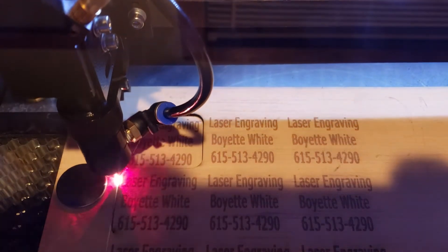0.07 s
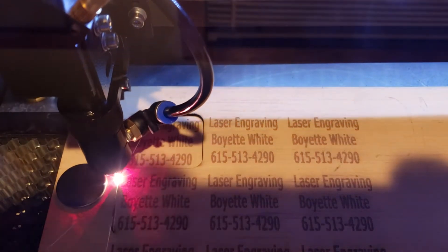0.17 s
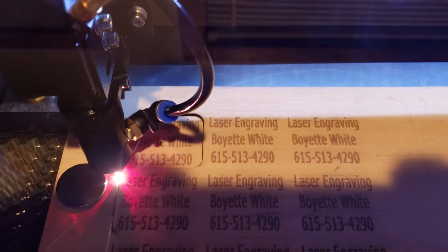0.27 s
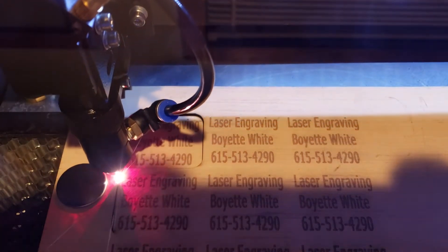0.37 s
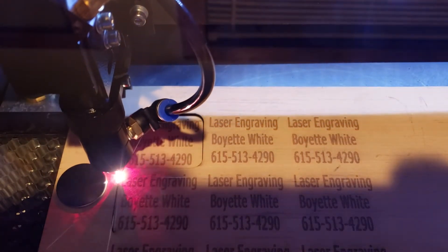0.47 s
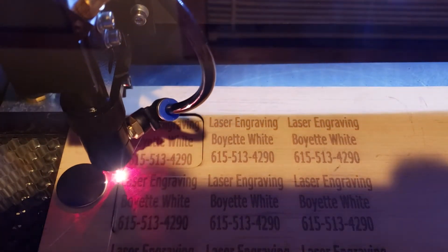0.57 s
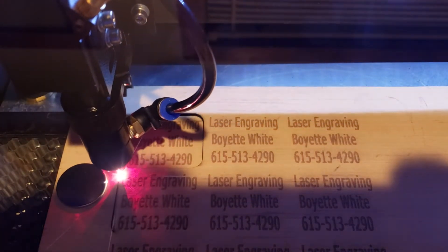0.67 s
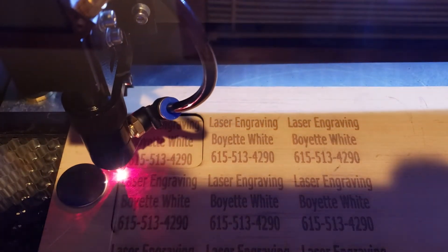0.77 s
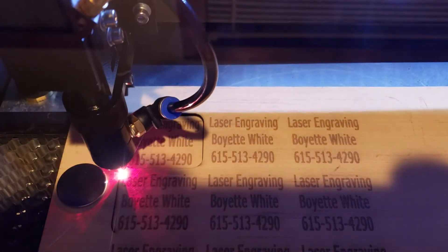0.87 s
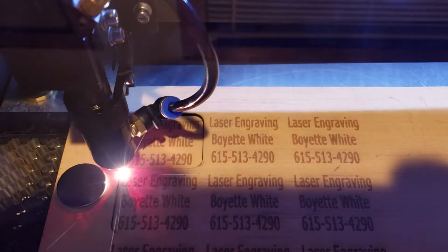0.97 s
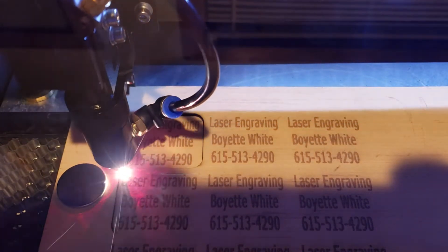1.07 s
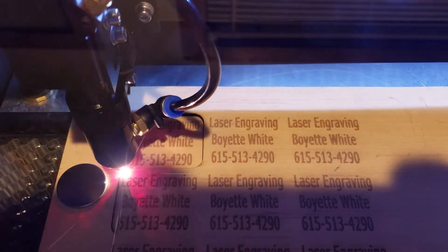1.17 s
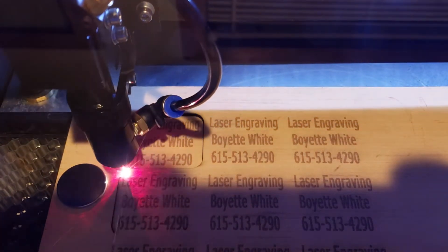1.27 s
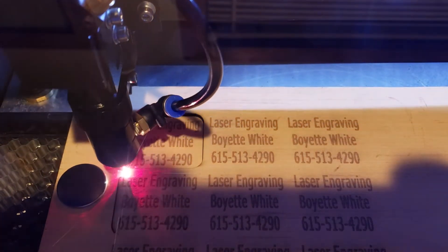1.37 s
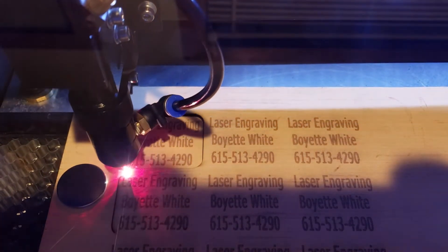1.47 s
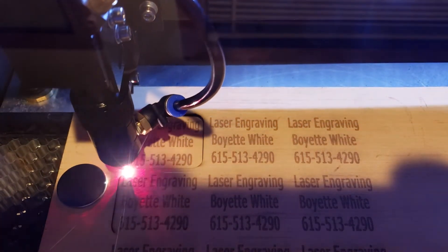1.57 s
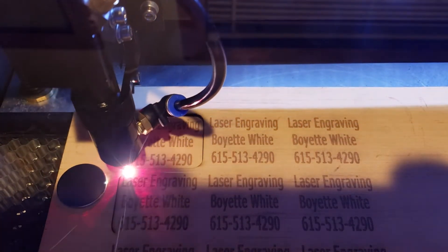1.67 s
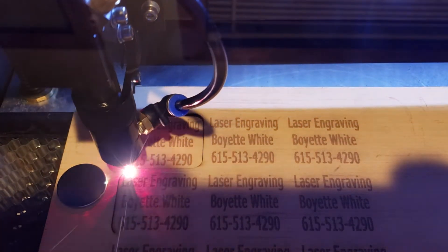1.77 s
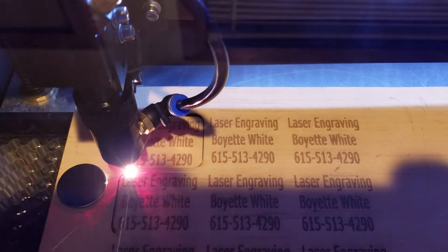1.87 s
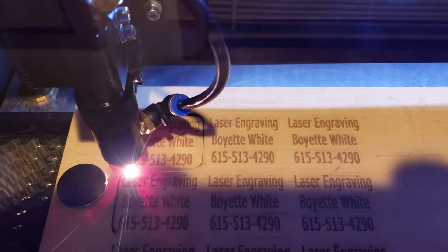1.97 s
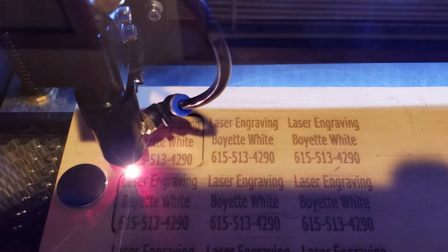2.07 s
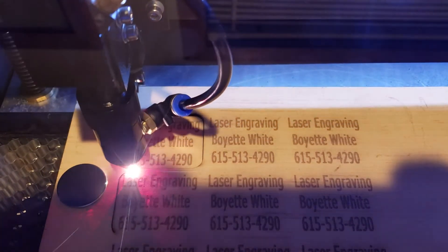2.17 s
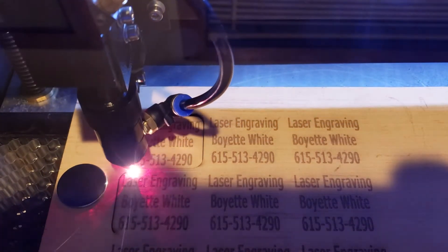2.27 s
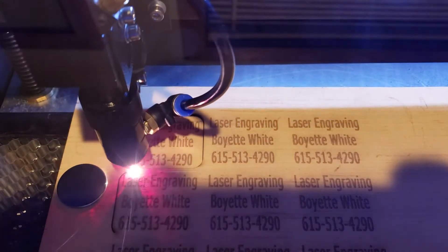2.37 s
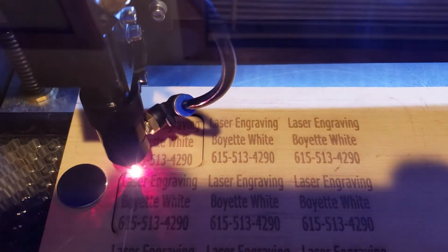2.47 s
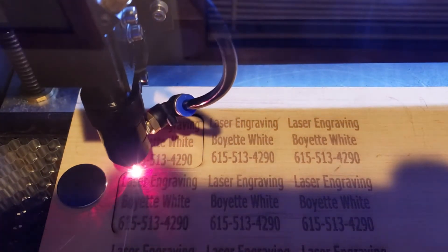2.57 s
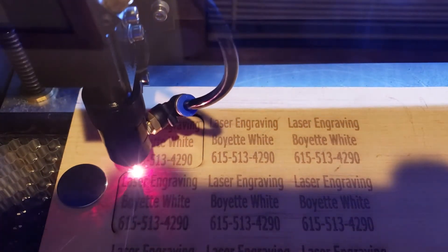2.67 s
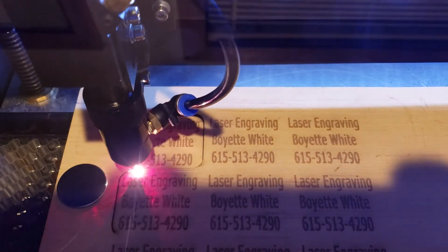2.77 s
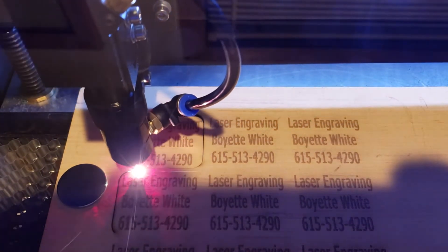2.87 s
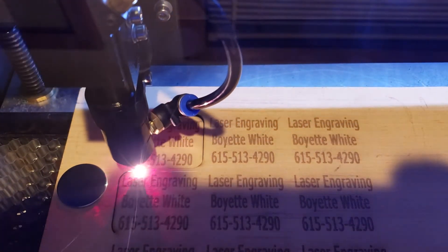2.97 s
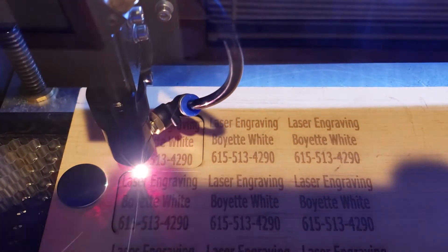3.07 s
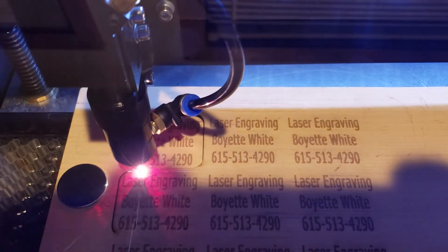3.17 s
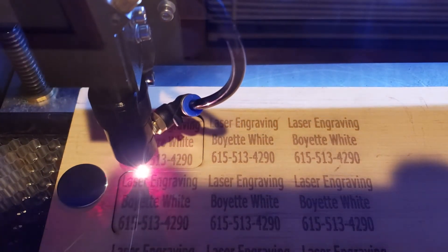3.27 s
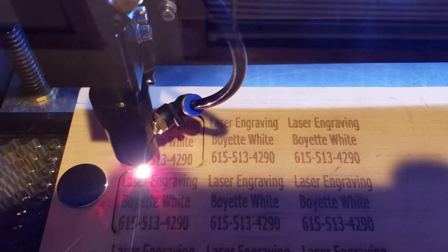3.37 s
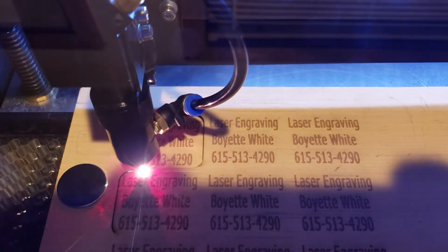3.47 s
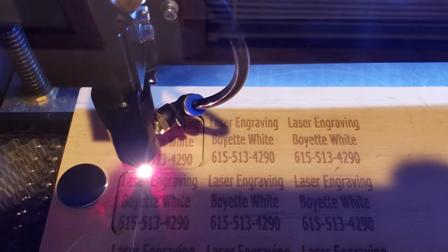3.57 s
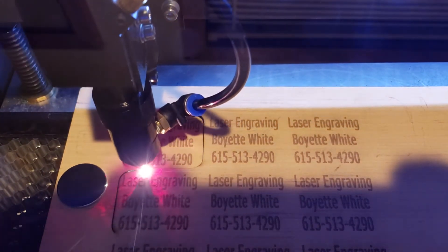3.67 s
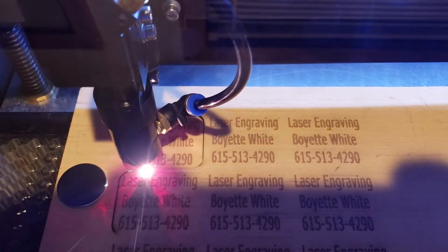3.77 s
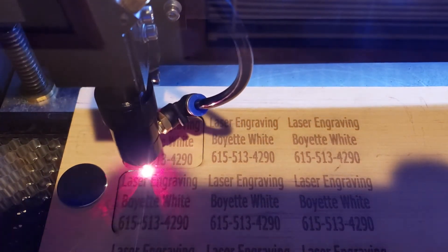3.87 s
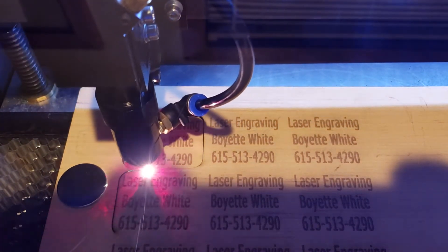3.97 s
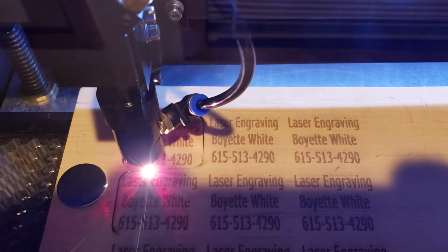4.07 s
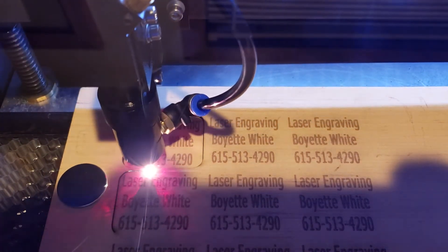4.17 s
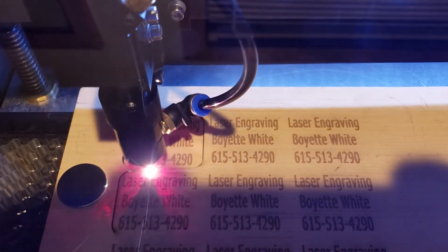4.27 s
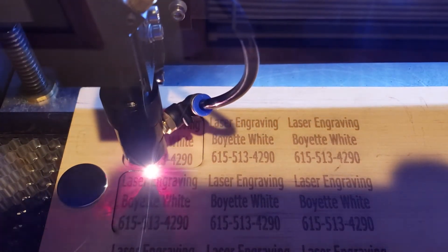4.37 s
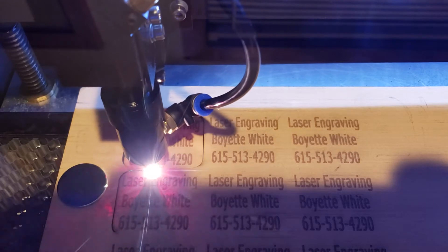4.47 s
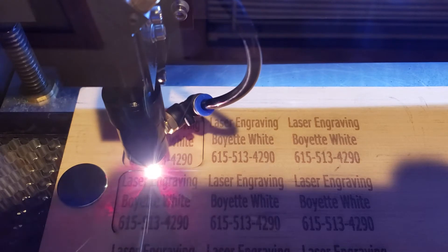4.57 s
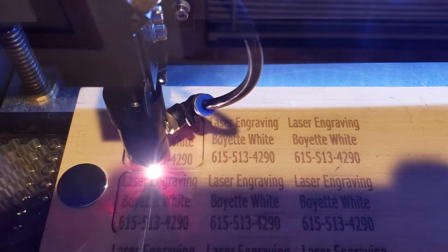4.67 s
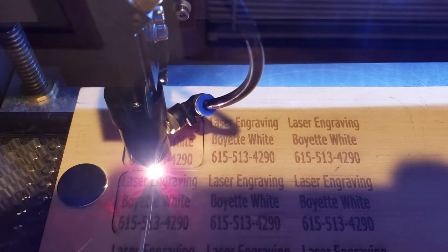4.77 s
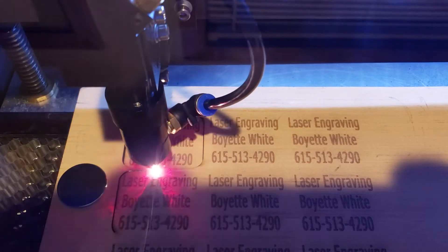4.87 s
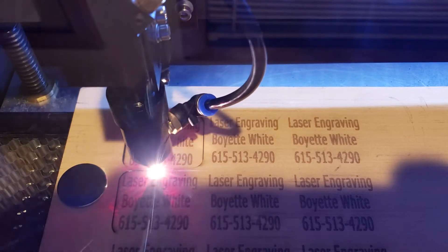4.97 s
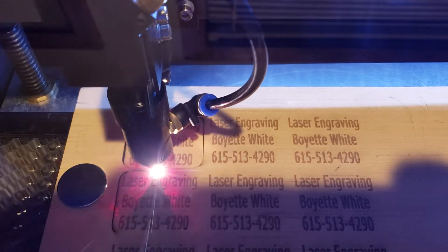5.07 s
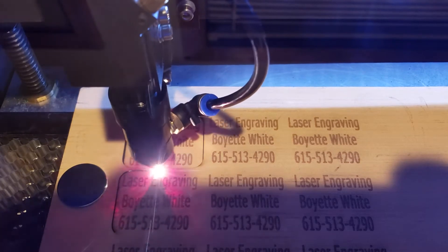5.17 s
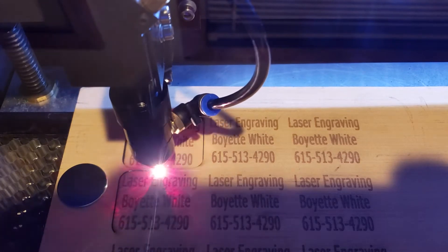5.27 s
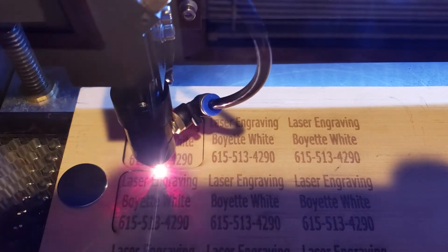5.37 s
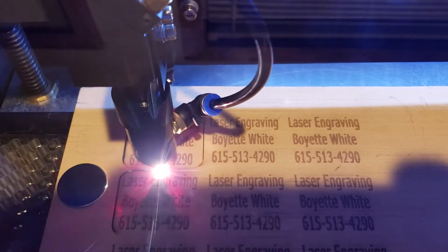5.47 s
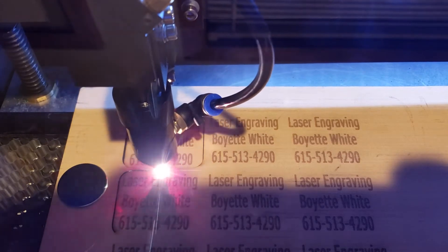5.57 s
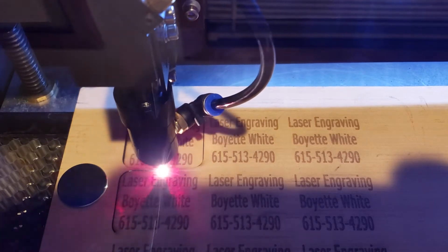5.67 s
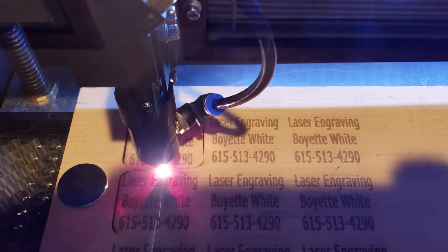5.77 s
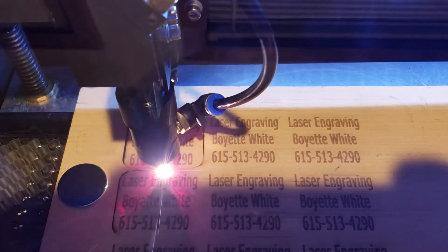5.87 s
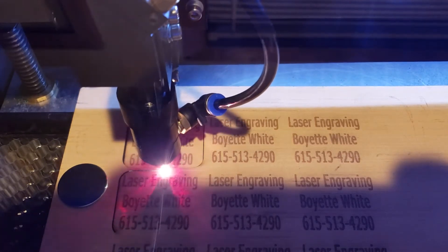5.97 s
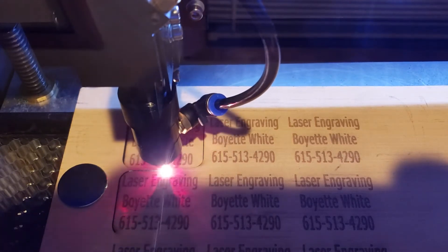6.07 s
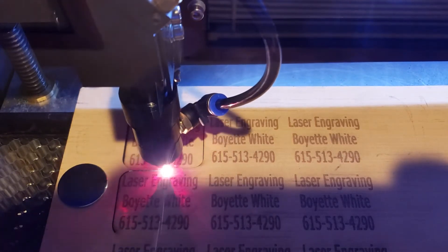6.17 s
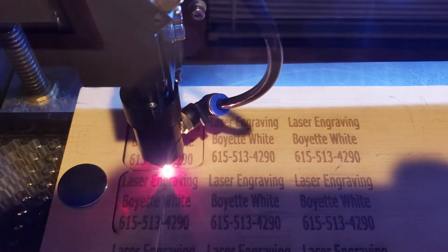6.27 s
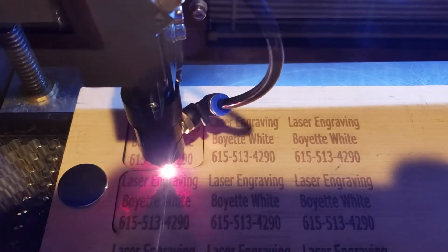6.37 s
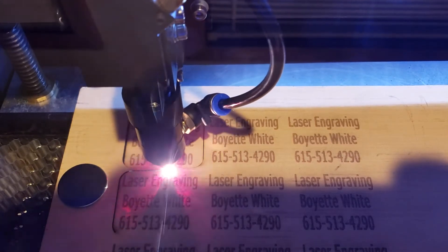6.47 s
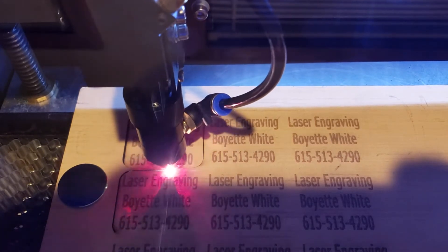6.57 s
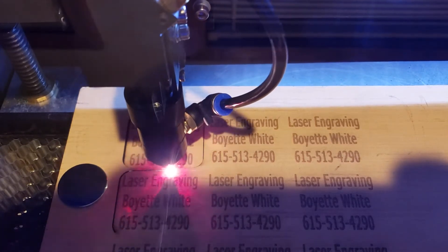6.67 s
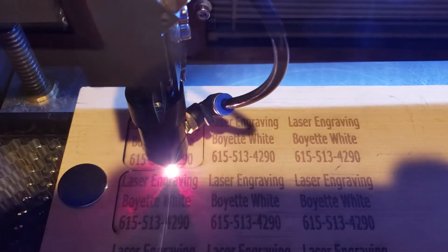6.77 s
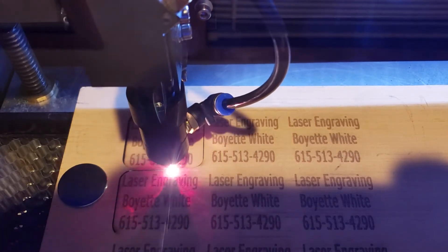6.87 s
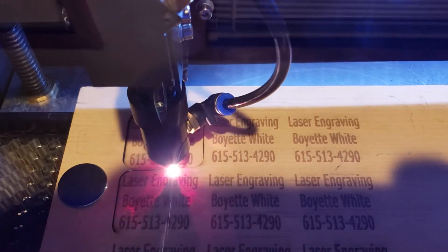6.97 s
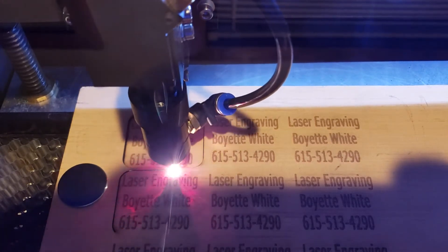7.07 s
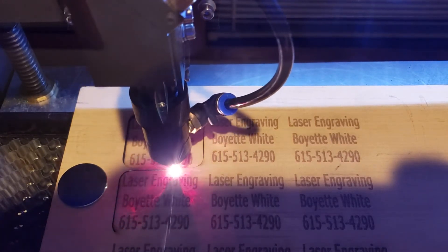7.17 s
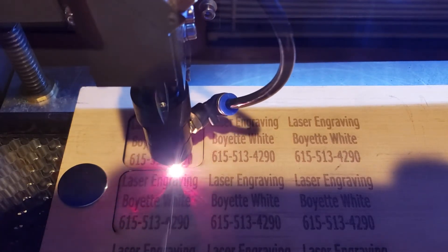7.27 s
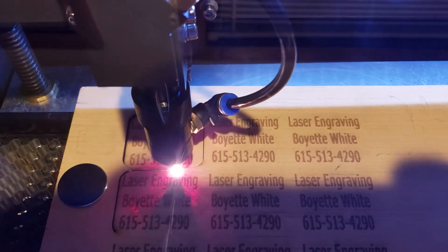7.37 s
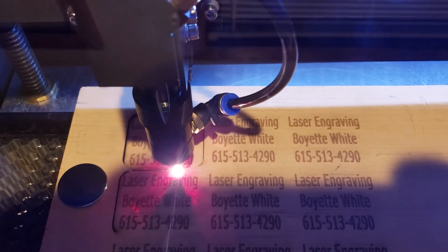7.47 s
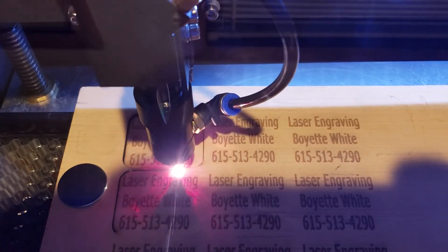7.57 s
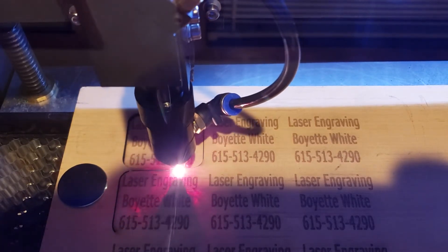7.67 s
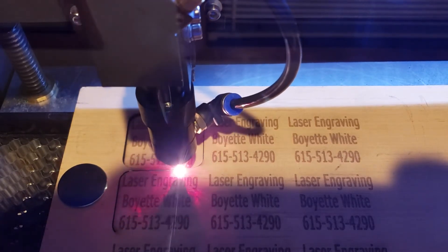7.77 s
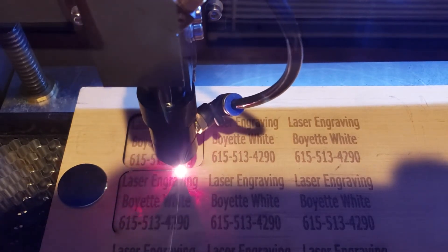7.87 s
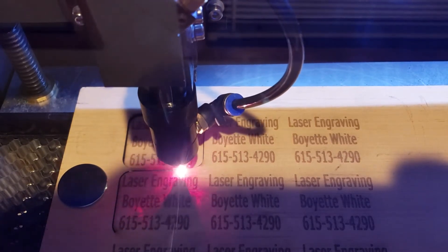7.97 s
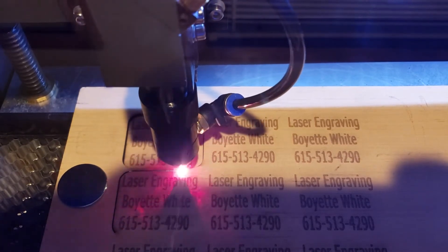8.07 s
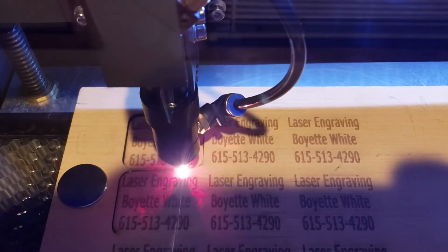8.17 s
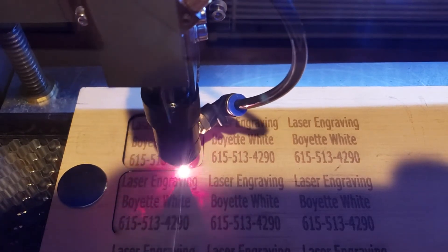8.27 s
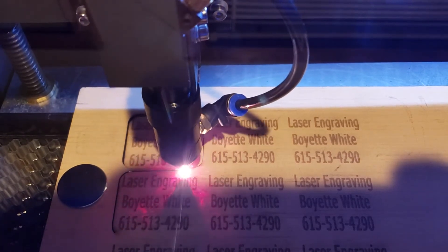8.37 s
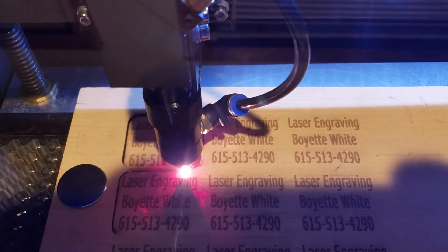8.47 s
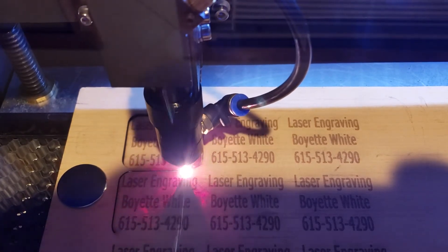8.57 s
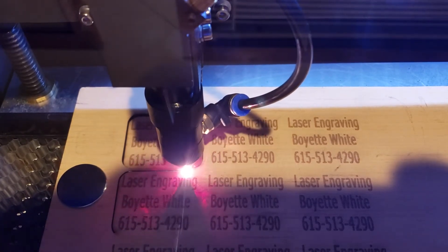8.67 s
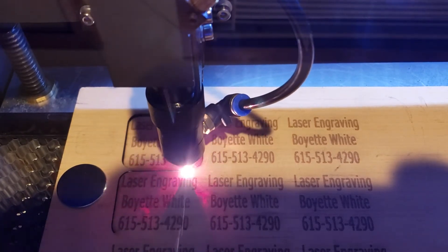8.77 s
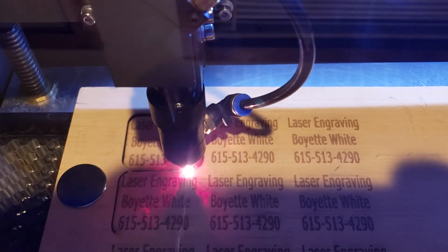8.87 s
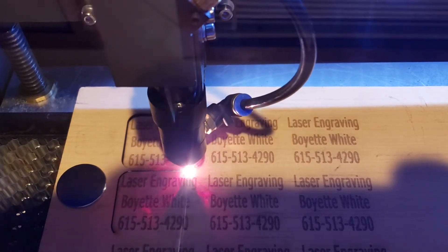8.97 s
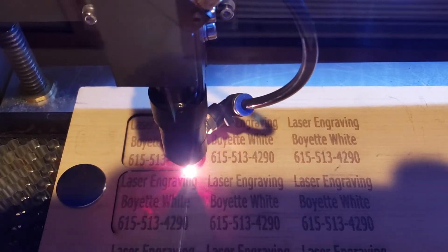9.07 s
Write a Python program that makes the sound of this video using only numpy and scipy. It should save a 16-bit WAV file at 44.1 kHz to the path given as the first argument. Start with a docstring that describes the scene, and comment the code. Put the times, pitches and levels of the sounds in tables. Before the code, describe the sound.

A laser engraver's motors chatter, shift pitch and settle into a steady whine over a rushing fan and buzzing air pump.

```python
"""Laser engraver rounding a corner

Close to the head, which keeps one speed: the gantry stepper chatters, slows and stops while the
carriage stepper runs up to a steady whine. Each axis hisses as it rolls, the frame shudders and
loose panels rattle, over a bed of exhaust fan and buzzing air pump. The whole sound swells about
three seconds in, and at the end a bright rush of air sets in at the nozzle."""
import sys
import numpy as np
from scipy import signal
from scipy.fft import rfft, irfft, next_fast_len
from scipy.io import wavfile

SR = 44100
rng = np.random.default_rng(int(sys.argv[2]) if len(sys.argv) > 2 else 0)


def digitize_waveform(pressure):
    """Quantize a signal to 16-bit integers and store it at the path in sys.argv[1].

    Rows of a 2-D input are taken as channels; values are limited to [-1, 1].
    """
    field = np.atleast_2d(pressure).T
    bounded = np.clip(field, -1, 1)
    quanta = np.round(bounded * 32767).astype(np.int16)
    wavfile.write(sys.argv[1], SR, quanta)


N = 401751
TIME = np.arange(N) / SR
FEED_HZ = 166.65  # step rate of an axis that carries all of the head's speed
MAINS_HZ = 59.97

# Resonances and peaks. Each row: centre in Hz, half width in Hz, lift in dB.
CARRIAGE_MOTOR_MODES = [(155.7, 2.3, 15), (237, 5.8, 11), (317, 2.5, 4), (328.98, 9.1, 12.5)]  # swept as the motor speeds up
GANTRY_MOTOR_MODES = [(151.2, 1.2, -9.5), (158.2, 3.9, 3.5), (240, 3.9, 6), (257.4, 9.7, 17),
                      (298, 18, 10.5), (324.3, 2.8, 11.5)]  # swept as the motor slows
CARRIAGE_HISS_PEAKS = [(3960, 120, 3), (5012, 14, 2.5), (5570, 58, 3), (5980, 10, 6), (6395, 12, 18),
                       (6330, 110, 3.5), (6660, 150, -8), (7430, 55, 12.5), (7617, 8, 14), (7750, 30, 5),
                       (8100, 250, -4), (9065, 12, 7), (9560, 25, 4), (9840, 50, 4), (10400, 25, 3),
                       (10691, 20, 7), (10950, 250, -3), (11574, 40, 5), (11845, 45, 10), (12075, 50, 9),
                       (12270, 90, 5), (12750, 260, -3.5), (13740, 45, 4), (14400, 600, -2.5),
                       (15300, 60, 5), (15625, 35, 9)]  # narrow peaks in the hiss, a thin whistle at the very top
GANTRY_HISS_PEAKS = [(4060, 170, 11.5), (6400, 60, 10), (6500, 200, -8), (7340, 150, 14), (8000, 170, 0),
                     (11920, 400, 8), (13750, 90, 1), (15620, 60, 8)]  # likewise for the gantry
NOZZLE_MODES = [(4000, 200, 6), (6650, 200, -1), (7320, 200, 9), (12150, 230, 12.5)]  # the head, rung by the air jet
CABINET_MODES = [(290, 23, -4.5), (340, 16, -1), (406, 6.5, -7), (442, 11, -2.5), (548, 13.7, 6),
                 (602, 22, 4.5), (652, 5, 0), (656.5, 5.5, 6.5), (686.4, 13.6, 11), (825, 9.4, 5),
                 (897, 14, 3.5), (986, 23, 5.5), (1178, 15, 3.5), (1476, 68, 4), (1607, 29, -3.5),
                 (1875, 126, 3.5), (2405, 83, 3.5), (3140, 38, -4), (3500, 45, -1), (3640, 110, 1.5),
                 (6560, 200, -1.5), (7230, 120, 7.5)]  # the hollow box around the exhaust air

# Noise colours. Each row: frequency in Hz, noise density in dB.
CARRIAGE_HISS = [(2000, -108), (4000, -99), (5800, -100.3), (8200, -109), (9500, -103), (11500, -100),
                 (15500, -103)]  # the light axis rolling
GANTRY_HISS = [(1000, -78), (2500, -86), (4000, -95), (6000, -89), (9500, -106), (12000, -99),
               (15500, -100)]  # the heavy axis rolling
FRAME_RUMBLE = [(35, -73), (60, -81), (120, -51.5), (180, -60.5), (280, -58), (400, -77), (900, -99),
                (4000, -130)]  # low end of belt and frame
TICK_COLOUR = [(500, -59), (850, -61), (1400, -66), (2400, -88), (6000, -105)]  # midrange snap
SQUEAK_COLOUR = [(9000, -125), (11000, -107), (11800, -93), (12400, -96), (13500, -115)]  # a thin band of high treble
NOZZLE_RUSH = [(700, -90), (1500, -77), (2300, -81), (4500, -87.5), (7000, -89), (10000, -92), (13000, -91),
               (15500, -99)]  # dull body of the jet
NOZZLE_HISS = [(2500, -101), (5000, -92), (8000, -90), (10500, -85), (13500, -83), (15500, -79)]  # its bright top
EXHAUST_AIR = [(22, -78), (38, -79), (55, -59), (130, -65), (300, -59.5), (400, -65.5), (500, -64),
               (750, -71), (1000, -75.5), (1600, -81), (2400, -86.5), (3300, -91), (6000, -100.5),
               (10000, -101.5), (15500, -102)]  # dark wash of the fan

# Overtones of the carriage. Each row: multiple of the step rate, level against the whine in dB,
# left over right in dB, left phase lead in radians.
CARRIAGE_OVERTONES = [(3, -18.5, 4, -.2), (4, -15.5, 1, 0), (6.5, -26, 4, -2.6)]
# The frame shudders as the axes hand over, and bumps along the straight.
# Each row: start in seconds, pitch in Hz, level in dB, seconds to fade by 60 dB.
FRAME_JOLTS = [(0.773, 267, -27, .2), (1, 227, -22, 0.2), (1.137, 101, -16.5, 0.064),
               (1.279, 236, -26, 0.28), (1.295, 297, -22.5, 0.42), (1.511, 65, -31, 0.86),
               (1.559, 165, -28.5, .25), (1.625, 242, -26.5, 0.33), (3.905, 677, -22.5, 0.18),
               (4.07, 674, -22, 0.09), (4.443, 266, -19, .06), (4.665, 288, -19, 0.065),
               (4.772, 656, -25, 0.18), (5.672, 556, -17, 0.066), (6.245, 660, -26.5, .15),
               (8.315, 542, -21, 0.054)]
# Loose panels. Each row: pitch in Hz, level in dB, seconds to fade by 60 dB, left over right in dB.
PANEL_MODES = [(552, -45, 0.039, -1), (674, -45, 0.065, -1), (1010, -59.5, .03, 4), (1300, -61, 0.022, -2),
               (1790, -57, 0.026, 2), (2054, -55.5, 0.023, -3), (2344, -53.5, 0.022, 0)]
# Snaps of small parts. Each row: start in seconds, level in dB.
TICKS = [(2.198, -4), (5.29, 0), (6.316, -9), (7.333, -4)]
# Bearing squeaks. Each row: peak time in seconds, half length in seconds, level in dB.
SQUEAKS = [(.37, .035, 4), (1.01, .025, 0), (1.065, .015, -1.5), (1.19, .02, -8)]
# Buzz of the air pump. Each row: multiple of the mains, level in dB, left over right in dB.
PUMP_HARMONICS = [(1, -47.0, -7), (2, -48.5, -11), (3, -47.3, -12), (4, -48.3, -13), (6, -45.5, -6),
                  (7, -49.5, -2), (9, -51.5, -1), (11, -44.3, 0), (12, -59.0, 3), (18, -68.0, 7),
                  (19, -63.0, -8), (20, -68.0, 7), (21, -70.0, 0), (30, -68.5, -5), (32, -69.0, -1),
                  (33, -69.0, 0), (34, -70.0, 10), (35, -65.3, -3), (37, -70.5, -2), (65, -77, -5),
                  (66, -71.8, -6), (67, -71.6, -7)]
# Hum of the fan. Each row: pitch in Hz, level in dB, left over right in dB.
FAN_TONES = [(45.2, -49.5, -13), (91.8, -63, -15), (255.9, -50, -2), (270.4, -51.5, -1), (294.4, -53, -2),
             (303.6, -47, 10), (342.1, -59, 21.5), (358, -57.5, 27.5)]
# Stereo image of the noise.
# Each row: frequency in Hz, likeness of the sides from -1 to 1, left over right in dB.
STEREO_SPREAD = [(45, .88, -2), (90, .7, -5), (140, .2, -3), (210, .6, -3), (300, .8, -1), (560, .91, 1),
                 (700, .88, 0), (1000, .5, 0), (1500, -.15, 0), (2000, .12, -1), (3000, -.1, -1),
                 (4000, .15, -2.5), (7000, .1, -2.5), (15000, .08, -3.3)]


def carriage(step_hz, hiss_rises_s=2, eases_s=8.14, fade_s=0.11, sag_db_per_s=0.7, steps_per_tooth=7):
    """The light axis hums at its step rate and whines on the octave; teeth and steps pulse its hiss."""
    risen, eased = ease(TIME - hiss_rises_s, fade_s), ease(TIME - eases_s, fade_s)
    whine, phase, octave_gain = stepper(
        step_hz, CARRIAGE_MOTOR_MODES, wobble_rad=0.062,
        hum_db=-46 - 2.5 * eased, hum_left_db=-3.5, hum_lead=2.17, hum_rough=0.077,
        octave_db=-44 - 2.5 * eased, octave_left_db=6, octave_rough=0.047)
    overtones = sum(from_db(db + 0.89 * drift(4.2)) * tone(multiple * phase, left_db, lead)
                    for multiple, db, left_db, lead in CARRIAGE_OVERTONES)
    belt_pulse = .07 * np.sin(phase / steps_per_tooth)
    step_pulse = .045 * (np.sin(2 * phase) + np.sin(3 * phase))
    hiss_db = -2.5 + 7.5 * risen - 7 * eased - sag_db_per_s * TIME
    flicker_db = 1.1 * drift(22)
    rolling = (step_hz / FEED_HZ) ** 1.1 * from_db(hiss_db + flicker_db)
    hiss = rolling * (1 + belt_pulse + step_pulse) * stereo_noise(CARRIAGE_HISS, CARRIAGE_HISS_PEAKS)
    return whine + overtones * octave_gain + hiss * pan(-0.99)


def gantry(step_hz, chatter):
    """The heavy axis drones; while it chatters it booms on the left and its bearings rasp on the right."""
    drone, phase, _ = stepper(
        step_hz, GANTRY_MOTOR_MODES, wobble_rad=0.07,
        hum_db=-48 + 22 * chatter, hum_left_db=20.5, hum_lead=-0.72, hum_rough=0.055,
        octave_db=-44.5, octave_left_db=6.5, octave_rough=0.34)
    rolling = step_hz / FEED_HZ * from_db(-17 + 11 * chatter)
    step_pulse = 0.12 * np.sin(phase)
    hiss = rolling * (1 + step_pulse) * stereo_noise(GANTRY_HISS, GANTRY_HISS_PEAKS)
    return drone + hiss * pan(-14)


def stepper(step_hz, modes, wobble_rad, hum_db, hum_left_db, hum_lead, hum_rough,
            octave_db, octave_left_db, octave_rough):
    """Torque ripple sings at the step rate and its octave, growing with speed, unsteadied by the belt."""
    wandering_hz = step_hz * (1 + 0.00157 * drift(0.7))
    phase = 2 * np.pi * np.cumsum(wandering_hz) / SR + wobble_rad * drift(22)
    hum_gain = step_hz / FEED_HZ * from_db(hum_db + resonance_db(modes, step_hz))
    octave_gain = step_hz / FEED_HZ * from_db(octave_db + resonance_db(modes, 2 * step_hz))
    hum = hum_gain * tone(phase, hum_left_db, hum_lead) * (1 + hum_rough * drift(35))
    octave = octave_gain * tone(2 * phase, octave_left_db, lead=-0.62) * (1 + octave_rough * drift(14))
    return hum + octave, phase, octave_gain


def step_rates(turn_rad_per_s=.71, corner_end_s=2.125):
    """Round the corner the gantry slows as the cosine of the heading; the carriage rises as its sine."""
    heading = np.clip(np.pi / 2 + turn_rad_per_s * (TIME - corner_end_s), 0, np.pi / 2)
    return FEED_HZ * np.cos(heading), FEED_HZ * np.sin(heading)


def frame_shudders(gantry_hz, chatter, stop_hz=39.3, lull_s=1.2, attack_s=0.0051):
    """The frame rumbles as the gantry moves, on the left in the chatter; each jolt rings a low mode."""
    lull = np.exp(-((TIME - lull_s) / 0.051) ** 2)
    force = ease(gantry_hz - stop_hz, 12) * from_db(-1 + 0.5 * chatter - 21 * lull)
    out = force * pan(21 * chatter) * stereo_noise(FRAME_RUMBLE)
    for start_s, hz, db, t60 in FRAME_JOLTS:
        age = np.clip(TIME - start_s, 0, 2)
        envelope = from_db(db - 60 * age / t60) * (1 - np.exp(-age / attack_s))
        out += envelope * np.sin(2 * np.pi * hz * age)
    return out


def panel_rattle(contacts_per_s=85, scatter_db=2.5, throb_db=4):
    """Loose panels buzz on the cabinet in uneven bouts; each contact strikes every mode differently."""
    contacts = rng.random(N) < contacts_per_s / SR
    bouts = from_db(-1 + throb_db * np.tanh(drift(5)))
    out = np.zeros((2, N))
    for hz, db, t60, left_db in PANEL_MODES:
        strength = from_db(db + scatter_db * rng.uniform(-1.3, 1, N)) * rng.choice([-1, 1], N)
        out += pan(left_db) * ring(contacts * bouts * strength, hz, t60)
    return out


def ticks(t60=0.025):
    """Now and then a small part snaps against the frame."""
    envelope = sum((TIME >= start_s) * from_db(db - 60 * np.abs(TIME - start_s) / t60)
                   for start_s, db in TICKS)
    return envelope * stereo_noise(TICK_COLOUR)


def bearing_squeaks():
    """The bearings give a few short, very high squeaks in the corner."""
    envelope = sum(from_db(db) * np.exp(-((TIME - peak_s) / half_s) ** 2)
                   for peak_s, half_s, db in SQUEAKS)
    return envelope * stereo_noise(SQUEAK_COLOUR)


def nozzle(start_s=8.94, attack_s=0.048, opens_s=9.024):
    """The air jet rings the metal head with a dull, sputtering rush, then opens into a bright hiss."""
    rush = np.clip((TIME - start_s) / attack_s, 0, 1) * stereo_noise(NOZZLE_RUSH, NOZZLE_MODES)
    hiss = from_db(-3.5) * ease(TIME - opens_s, .008) * stereo_noise(NOZZLE_HISS)
    sputter = from_db(drift(91))
    return sputter * (rush + hiss) * pan(2.6)


def air_pump(waver_db=2, jitter_rad=0.011):
    """A mains-driven pump buzzes in many harmonics; uneven strokes blur the highest ones."""
    mains_phase = 2 * np.pi * MAINS_HZ * TIME + jitter_rad * drift(29)
    out = np.zeros((2, N))
    for multiple, db, left_db in PUMP_HARMONICS:
        phase = multiple * mains_phase + rng.uniform(0, 2 * np.pi)
        gain = from_db(db - 1.5 + waver_db * drift(4.9))
        out += gain * tone(phase, left_db, lead=-multiple * 0.0088)
    return out


def pump_rattle(scatter_db=3):
    """Each pump stroke rattles the housing the same way: a comb of faint upper harmonics."""
    multiples = np.setdiff1d(np.arange(13, 95), np.array(PUMP_HARMONICS)[:, 0])  # gaps in the buzz
    shape = (2, len(multiples))
    contour_db = at_hz(EXHAUST_AIR, multiples * MAINS_HZ)[0] + 4
    gains = from_db(contour_db + rng.normal(0, scatter_db, shape))
    cycle = np.linspace(0, 1, 2048)
    phases = 2 * np.pi * (multiples[:, None] * cycle + rng.random(shape)[..., None])
    stroke = np.sum(gains[..., None] * np.sin(phases), axis=1)
    return np.sqrt(2) * np.array([np.interp(TIME * MAINS_HZ % 1, cycle, side) for side in stroke])


def exhaust_fan(wobble_rad=0.37, boom_hz=150, boom_db=2.5, sag_db_per_s=0.7):
    """Air flutters through the resonant cabinet with wandering fan tones; the low boom slowly eases."""
    air = stereo_noise(EXHAUST_AIR, CABINET_MODES) * from_db(drift(28))
    hum = sum(from_db(db) * tone(2 * np.pi * hz * TIME + wobble_rad * drift(1.03), left_db)
              for hz, db, left_db in FAN_TONES)
    fan = air + hum
    boom = signal.sosfilt(signal.butter(1, boom_hz, fs=SR, output="sos"), fan)
    return fan + boom * (from_db(boom_db - sag_db_per_s * TIME) - 1)


def stereo_noise(colour, resonances=(), wall_gain=1.25, left_lag_s=.00008):
    """Wide noise, coloured by a spectrum, its peaks and the reflections off the cabinet walls."""
    size = next_fast_len(N)
    near, far = rfft(rng.standard_normal((2, size)))
    hz = np.arange(len(near)) * SR / size + 1e-3
    level_db = at_hz(colour, hz)[0] + resonance_db(resonances, hz)
    low_cut = 1 / np.sqrt(1 + (.5 * colour[0][0] / hz) ** 4)
    gain = from_db(level_db) * np.sqrt(SR / 2) * low_cut
    # thin walls reflect only the treble: part of it reaches both sides by different paths
    reflected = .2 / (1 + (1000 / hz) ** 4)
    far = np.sqrt(1 - reflected) * far + np.sqrt(reflected) * near * wall_bounce(size)
    depth = reflected * wall_gain
    wall_ripple = (1 + depth * wall_bounce(size)) / np.sqrt(1 + depth ** 2)  # alike on both sides
    likeness, left_db = at_hz(STEREO_SPREAD, hz)
    mid = np.sqrt(1 + likeness) * (near + far) / 2
    side = np.sqrt(1 - likeness) * (near - far) / 2
    lag = np.exp(-2j * np.pi * hz * [[left_lag_s], [0]])
    pair = np.array([mid + side, mid - side]) * lag * pan(left_db)
    return irfft(pair * gain * wall_ripple, size)[:, :N]


def wall_bounce(size, ripple_width_hz=22):
    """The phase twist of a path that bounces about the cabinet: it wanders at random with frequency."""
    step = np.sqrt(SR / size / ripple_width_hz)
    return np.exp(1j * step * np.cumsum(rng.standard_normal(size // 2 + 1)))


def ring(drive, hz, t60):
    """A mode that a unit click sets ringing at height 1."""
    decay, angle = from_db(-60 / (t60 * SR)), 2 * np.pi * hz / SR
    return signal.lfilter([0, np.sin(angle)], [1, -2 * decay * np.cos(angle), decay ** 2], drive + 1e-18)


def tone(phase, left_db, lead=0):
    """A panned sine, rms 1 when centred; the left side leads by `lead` radians."""
    return np.sqrt(2) * pan(left_db) * np.sin(phase + np.array([[.5], [-.5]]) * lead)


def drift(rate_hz):
    """A smooth random modulator with a spread of 1."""
    hop, run_in = 40, 2000
    pole = np.exp(-2 * np.pi * rate_hz * hop / SR)
    noise = rng.standard_normal(N // hop + run_in + 2)
    slow = signal.lfilter([1], [1, -2 * pole, pole * pole], noise)[run_in:]
    return np.interp(np.arange(N) / hop, np.arange(len(slow)), slow / slow.std())


def resonance_db(resonances, hz):
    """How much a set of resonances lifts or dips each frequency."""
    return sum(db / (1 + ((hz - centre) / width) ** 2) for centre, width, db in resonances)


def at_hz(rows, hz):
    """Each column of a spectrum, read along a log-frequency axis."""
    points, *columns = np.transpose(rows)
    return [np.interp(np.log(hz), np.log(points), column) for column in columns]


def ease(x, width):
    """A soft switch from 0 to 1 as x passes zero."""
    return .5 + .5 * np.tanh(x / width)


def pan(left_db):
    """Left and right gains, left_db apart."""
    return from_db(np.array([[.5], [-.5]]) * left_db)


def from_db(db):
    """Decibels to gain."""
    return np.exp(np.asarray(db) * (np.log(10) / 20))


def scene(chatter_above_hz=143.6, chatter_lift_db=2, quiet_db=-6, swell_s=3.06):
    """Both axes over fan and pump; the overall level lifts a little in the chatter and later swells."""
    gantry_hz, carriage_hz = step_rates()
    chatter = ease(gantry_hz - chatter_above_hz, 1.1)
    axes = gantry(gantry_hz, chatter) + carriage(carriage_hz)
    rattles = frame_shudders(gantry_hz, chatter) + panel_rattle() + ticks() + bearing_squeaks()
    air = air_pump() + pump_rattle() + exhaust_fan() + nozzle()
    quiet = ease(swell_s - TIME, 0.39)
    return (axes + rattles + air) * from_db(0.07 + quiet_db * quiet + chatter_lift_db * chatter)


def record(dry, cutoff_hz=15720):
    """A steep low-pass takes off the very top."""
    return signal.sosfilt(signal.ellip(12, .1, 80, cutoff_hz, fs=SR, output="sos"), dry)


dry = scene()
out = record(dry)
digitize_waveform(out)
```